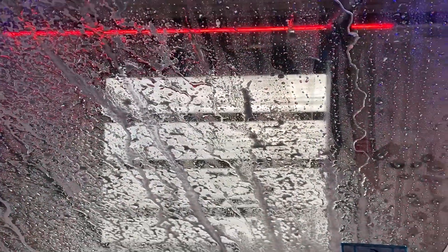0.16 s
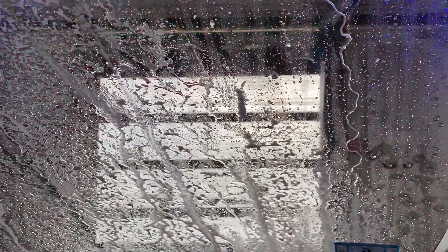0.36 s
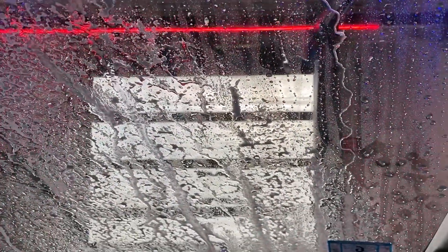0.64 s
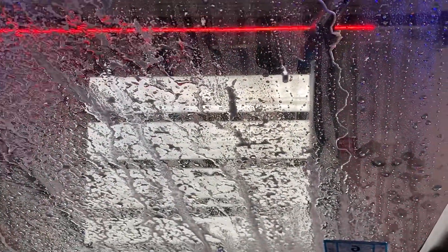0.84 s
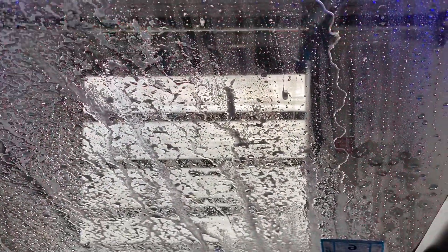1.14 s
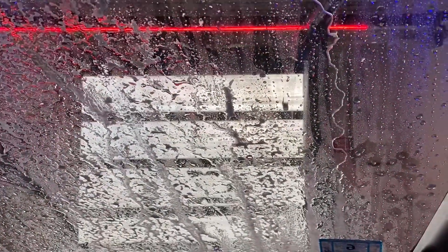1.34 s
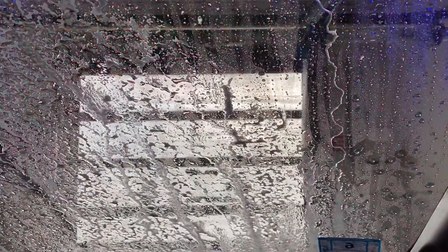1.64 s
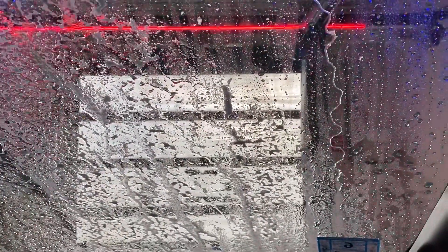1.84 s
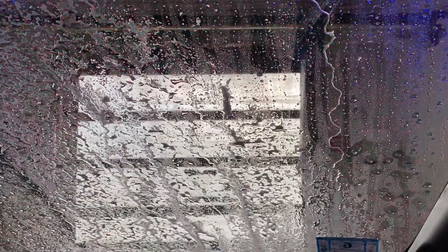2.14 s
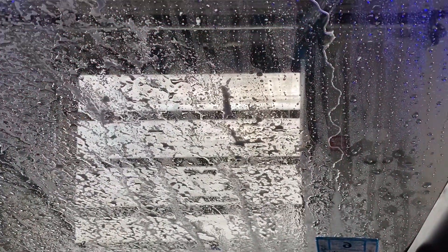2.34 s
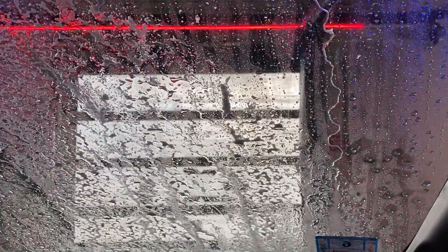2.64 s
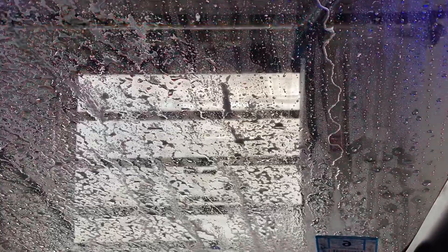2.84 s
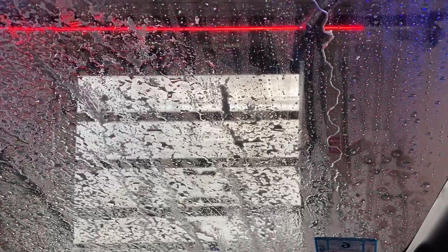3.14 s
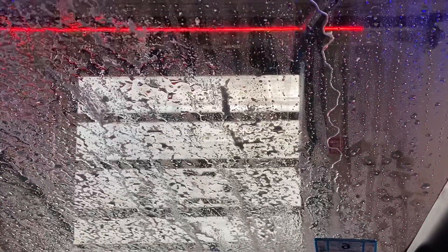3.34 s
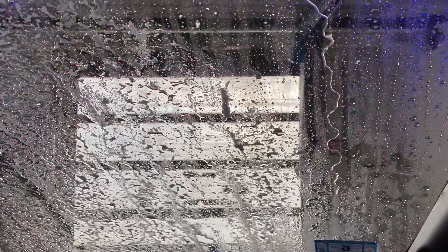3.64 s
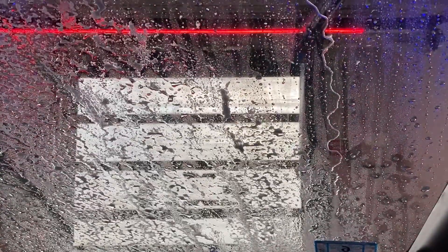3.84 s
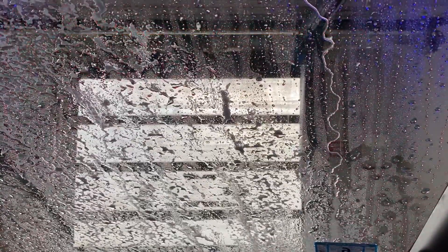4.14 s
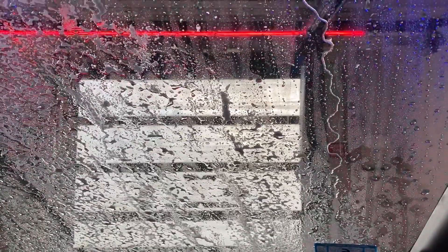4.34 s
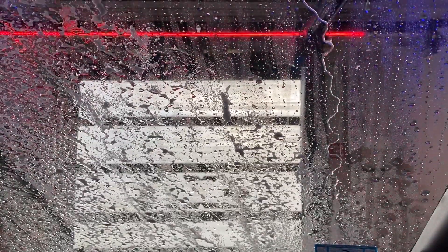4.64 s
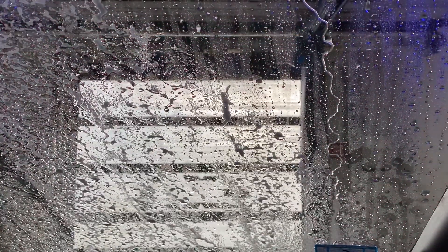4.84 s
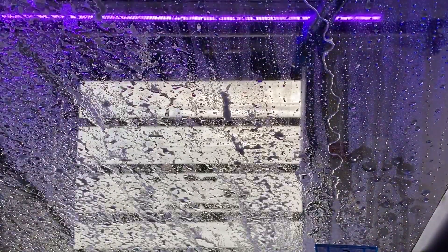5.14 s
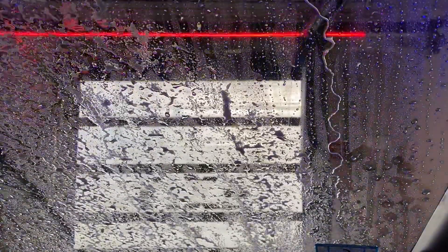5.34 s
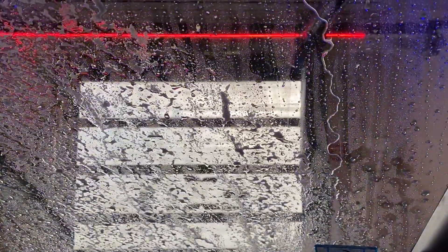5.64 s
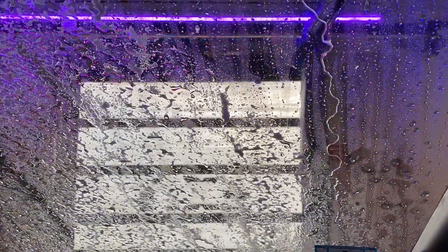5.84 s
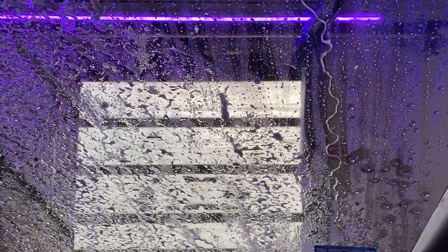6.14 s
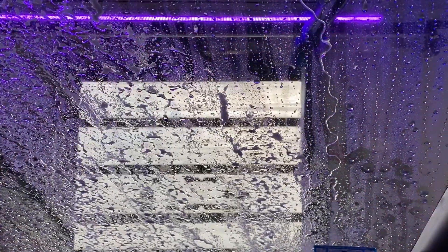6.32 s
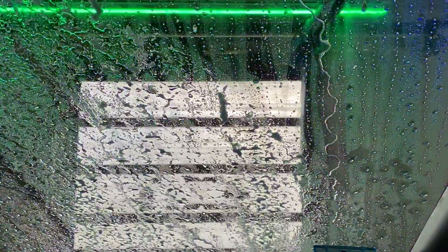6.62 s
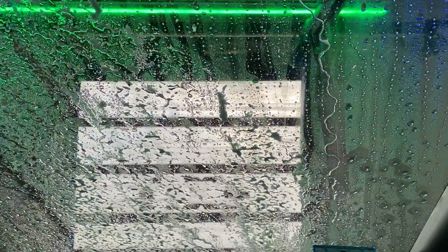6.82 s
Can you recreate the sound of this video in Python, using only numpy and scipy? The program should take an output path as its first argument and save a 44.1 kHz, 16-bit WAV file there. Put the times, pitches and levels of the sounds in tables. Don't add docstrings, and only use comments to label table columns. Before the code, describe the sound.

A wash machine works around a car, picked up in stereo within the sealed cabin. Its quiet hum wavers and dips above muffled bay noise and irregular sub-bass nudges; a small dull tick lands on the window midway. Late on, a pump kicks in with faint knocking, short pipe tones and low gulps, then spray rushes over the panels, growing louder and brighter as a bass drone booms.

```python
import sys
import numpy as np
from scipy import signal
from scipy.fft import rfft, irfft, next_fast_len
from scipy.io import wavfile
from scipy.ndimage import uniform_filter1d, map_coordinates

SR = 44100
rng = np.random.default_rng(int(sys.argv[2]) if len(sys.argv) > 2 else 0)


def master_out(mix):
    frames = np.transpose(np.atleast_2d(mix))
    ceiling = np.clip(frames, -1, 1)
    pcm = np.round(ceiling * 32767).astype(np.int16)
    wavfile.write(sys.argv[1], SR, pcm)


def ratio(d):
    e = np.asarray(d, float) / 20
    return 10 ** e


N = 307811

# start_s, crank_hz
CRANK = [
    (4.9, 42.4),
    (5.5, 42.1),
    (6.3, 42.15),
    (6.5, 42),
    (6.98, 41.85),
]
LOAD_ON_S = (6.1, 6.27)
# filling_db, loaded_db
CRANK_ORDERS_DB = [(-56, -51), (-54, -27.5), (-52, -52)]
KNOCK_ORDERS = [4, 5, 6, 8, 9, 10, 11, 12, 15, 16, 18, 19, 20, 21, 22, 23]
# filling_db, loaded_db
KNOCK_LEVELS = [(-54, -56), (-63.5, -58.5), (-66, -60), (-63.5, -68.5), (-64.5, -60), (-73.5, -63),
                (-80, -64), (-70.5, -68.5), (-75, -79.5), (-71.5, -85), (-80, -75), (-76, -78.5),
                (-72, -71), (-73.5, -74), (-71.5, -84), (-82, -81)]
# pitch_hz, level_db
GEAR_WHINES = [(404.9, -56.5), (1723, -74.5), (1906, -76), (2776, -80.5)]
# centre_s, pitch_hz, level_db,
# half_length_s
PIPE_SONGS = [
    (5.048, 723, -71.5, 0.046),
    (5.22, 1070, -67.5, 0.084),
    (5.241, 1000, -73, .05),
    (5.33, 113.2, -42, 0.12),
    (6.45, 465.4, -61, 0.16),
    (5.38, 675, -62.5, 0.024),
    (5.46, 337, -56, .08),
    (5.785, 633, -62.5, 0.13),
    (6.194, 139.4, -40.5, 0.069),
    (6.85, 503.4, -61, .15),
]
# start_s, level_db (under full)
PRESSURE = [
    (4.9, -44),
    (5.02, -38.5),
    (5.2, -23.5),
    (5.55, -15.5),
    (5.63, -13.5),
    (5.925, -14.5),
    (5.96, -9),
    (6.4, -5.5),
    (6.98, 1),
]
PIPES_FULL_DB = -20
# pitch_hz, slope (dB per dB of pressure), knee_db (pressure
# that sets it going), extra_slope (dB per dB below the knee)
SPRAY_GROWTH = [(820, 0.12, -19, .7), (1240, 0.5, -20.5, .45), (1900, 0.9, -20, 0.4),
                (3600, 1.03, -16.5, .05), (6700, 0.95, -10.5, 1.2), (11000, 1.1, -10.5, 1.2),
                (14800, 1.5, -9.5, 4)]
# pitch_hz, level_db (per Hz)
SPRAY_SPECTRUM = [(70, -27.5), (115, -4.5), (185, -21.5), (300, -27.5), (410, -28.5), (590, -33.5),
                  (850, -33.5), (1080, -34.5), (1900, -33), (3400, -41.5), (7000, -48.5), (8300, -58),
                  (14000, -53.5), (15800, -61)]

MOTOR_HZ = 16.99
SIXTH_DB, FIFTH_DB = -41, -46.5
WEAK_ORDERS = [4, 9, 10]
WEAK_ORDERS_DB = [-64, -61, -65]
# centre_s, change_db, half_length_s
LOAD_SHIFTS = [(.08, 2.5, 0.17), (.36, -18, .13), (.62, -0.5, 0.11), (1.33, -14, .07), (1.5, 4.5, 0.13),
               (2.22, 3.5, .15), (2.78, -14, .13), (3.44, -9, 0.047), (4.15, 3, 0.29), (4.55, -6.5, 0.045),
               (4.68, 1.5, 0.069), (4.84, -23.5, 0.057), (5.24, 6, 0.08), (5.55, -16.5, 0.094),
               (5.97, -7.5, .06), (6.33, -5.5, 0.096), (6.82, 5.5, 0.19)]
# pitch_hz, level_db
BAY_WHINES = [(336, -69), (838.6, -83), (1087, -88), (1996, -95), (2188, -96), (4594, -110), (11898, -113),
              (12102, -113)]

# start_s, peak_db
DRIPS = [
    (3.3318, -53),
    (4.1788, -67),
]

THROB_HZ, THROB_DB = 44.6, -53
# centre_s, rise_db
JOLTS = [(0.041, -9), (.45, 6), (1.25, 4.5), (1.54, 4.5), (1.9, 6.5), (3.15, 7), (3.47, 4.5), (4.25, 10),
         (4.75, 9), (5.6, 9), (6.25, 11.5), (6.72, 5)]
JOLT_S = 0.19
# pitch_hz, level_db (per Hz)
CABIN_MODE = [(18, -27.5), (30, -11.5), (37, -8), (45, 11.5), (57, 1), (70, -21.5), (110, -120)]
# pitch_hz, level_db (per Hz)
RUMBLE_SPECTRUM = [(18, -29.5), (32, -16), (55, -6.5), (75, -1), (100, -1), (125, -7), (150, -6),
                   (185, -18), (230, -18), (300, -29), (390, -50.5), (660, -120)]
# pitch_hz, level_db (per Hz)
BAY_SPECTRUM = [(120, -28.5), (220, -3.5), (335, -7.5), (425, -9), (465, -14), (790, -21.5), (1400, -31),
                (2250, -35), (2380, -40.5), (7500, -55.5), (9500, -57.5), (12000, -53), (13050, -54.5),
                (13200, -110)]
RUMBLE_DB, BAY_DB = -44.5, -58
# pitch_hz, width_hz, gain_db
PANELS = [(1163, 190, 4), (1680, 41, 1.5), (2186, 60, 5.5), (2730, 70, 4), (3120, 90, 5.5),
          (4000, 170, -1.5), (4500, 350, 2)]

# pitch_hz, side_over_mid_db
PORT_WIDTH = [(40, -19.5), (92, -17), (140, -12.5), (210, -7), (330, -8.5), (500, -0.5), (800, 0),
              (1170, 1), (1790, 2), (2500, -3.5), (4200, -2), (6900, -1.5), (8500, 1), (15000, 2)]
# pitch_hz, left_over_right_db
PORT_LEAN = [(60, -2), (110, 0), (200, -1.5), (380, 0.5), (700, -1.5), (1290, 1), (2380, 1), (4400, -6.5),
             (8120, 2), (15000, -0.5)]
# pitch_hz, gain_db
SUM_GAPS = [(8250, 0), (8450, -45.5), (9600, -45), (9750, -6.5), (10150, -7), (10300, -4), (14400, -3),
            (14500, -59)]
# pitch_hz, gain_db
DIFFERENCE_GAPS = [(10800, 0), (11000, -10), (11500, -8.5), (11650, -48), (13000, -53.5), (13150, -5)]


def unit(x):
    return x / np.sqrt(np.mean(x ** 2) + 1e-20)


def along(points, hz):
    f, v = np.transpose(points)
    return np.interp(np.log(hz + 1), np.log(f + 1), v)


def wobble(rate):
    return map_coordinates(rng.standard_normal(N // 500), [np.arange(N) * rate / SR])


def bumps(rows):
    t = np.arange(N) / SR
    return sum(db * np.exp(-((t - s) / half) ** 2) for s, db, half in rows)


def filtered(x, response):
    m = next_fast_len(N + SR // 2)
    return irfft(rfft(x, m) * response(np.fft.rfftfreq(m, 1 / SR)), m)[..., :N]


def tone(turns, db, lean_db=0, lead=0):
    half = np.array([[.5], [-.5]])
    phase = 2 * np.pi * (turns + rng.random()) + lead * half
    return np.sqrt(2) * ratio(db + lean_db * half) * np.sin(phase)


def rush(spectrum, patchy_db, shape_db=lambda hz, s: 0):
    def colour(f):
        return ratio(along(spectrum, f) + [0 * f, along(PORT_WIDTH, f)])

    hz, s, z = signal.stft(rng.standard_normal((2, N)), SR, nperseg=512)
    patches = uniform_filter1d(rng.standard_normal(z.shape[1:]), size=6, axis=0)
    patches = uniform_filter1d(patches, size=14, axis=1)
    scale = np.std(filtered(rng.standard_normal(N), lambda f: colour(f)[0]))
    level_db = patchy_db * unit(patches) + shape_db(hz[:, None], s)
    pair = signal.istft(z * ratio(level_db), SR, nperseg=512)[1][:, :N]
    mid, side = filtered(pair, colour) / scale
    ports = np.array([mid + side, mid - side])
    return filtered(ports, lambda f: ratio(along(PORT_LEAN, f) * [[.5], [-.5]]))


def pressure(t):
    s, db = np.transpose(PRESSURE)
    return np.interp(t, s, db, left=-90)


def pump():
    def spot():
        return dict(lean_db=rng.normal(0, 0.77), lead=rng.normal(0, 0.22))

    t = np.arange(N) / SR
    turns = np.cumsum(np.interp(t, *np.transpose(CRANK))) / SR
    load = np.interp(t, LOAD_ON_S, [0, 1])
    fill_db = np.minimum(pressure(t) - PIPES_FULL_DB, 0)

    first_db, second_db, third_db = (fill_db + a + (b - a) * load for a, b in CRANK_ORDERS_DB)
    first_db = first_db + 4 * wobble(6.6)
    second_db = second_db + 4 * np.maximum(t - LOAD_ON_S[1], 0)
    third_db = third_db + bumps([(5.36, 12, .16)]) + 2 * wobble(3.8)
    boom = tone(turns, first_db)
    boom = boom + tone(2 * turns, second_db, lean_db=-1.7, lead=0.23)
    boom = boom + tone(3 * turns, third_db, lean_db=-1.4)

    knock_db = .8 * fill_db + np.interp(load, [0, 1], [-4.5, -1])
    knock = 0
    for order, (filling_db, loaded_db) in zip(KNOCK_ORDERS, KNOCK_LEVELS):
        db = knock_db + filling_db + (loaded_db - filling_db) * load + 3 * wobble(8)
        knock = knock + tone(order * turns, db, **spot())

    gears = 0
    for hz, db in GEAR_WHINES:
        db = db + knock_db - 3 * (1 - load) + 2.5 * wobble(7)
        db = db + .5 * pressure(t) * (hz > 1000)
        gears = gears + tone(hz * t, db, **spot())

    air = 0
    for s, hz, db, half in PIPE_SONGS:
        db = db + 2.5 * wobble(25) * (hz > 300) - 6 * ((t - s) / half) ** 2
        air = air + tone(hz * t + .1 * wobble(30), db, lead=0.49)
    return boom + knock + gears + air


def spray():
    def shape_db(hz, t):
        slope, knee_db, extra = (along([(row[0], row[k]) for row in SPRAY_GROWTH], hz) for k in (1, 2, 3))
        return slope * pressure(t) + extra * np.minimum(pressure(t) - knee_db, 0)

    return ratio(-43.5 + .4 * wobble(10)) * rush(SPRAY_SPECTRUM, 0.57, shape_db)


def motor():
    t = np.arange(N) / SR
    turns = np.cumsum(MOTOR_HZ + .01 * wobble(3)) / SR
    sixth_db = SIXTH_DB + bumps(LOAD_SHIFTS) + 2.3 * wobble(7.8)
    fade_db = np.interp(t, [6.08, 6.2], [0, -25])
    fifth_db = FIFTH_DB + 1.4 * wobble(8) + fade_db
    strong = tone(6 * turns, sixth_db) + tone(5 * turns, fifth_db, lean_db=0.8)
    weak = sum(tone(order * turns, db + 2 * wobble(4), lean_db=-4)
               for order, db in zip(WEAK_ORDERS, WEAK_ORDERS_DB))
    whines = sum(tone(hz * t, db + 2 * wobble(3.3), lead=rng.normal(0, .7)) for hz, db in BAY_WHINES)
    return strong + weak + whines


def drips():
    out, t = np.zeros((2, N)), np.arange(SR // 20) / SR
    strike = ratio(-60 * t / .03) * (1 - np.exp(-t / .0007))
    rebound = .4 * ratio(-60 * np.abs(t - .011) / .06) * (t > .011)
    for s, db in DRIPS:
        tick = (strike + rebound) * rng.standard_normal((2, len(t)))
        out[:, round(s * SR):][:, :len(t)] += ratio(db + 4) * tick
    glass = [(600, -30), (1200, 2), (3000, -6), (5300, -12), (6500, -40)]  # (Hz, dB)
    return filtered(out, lambda f: ratio(along(glass, f)))


def bay():
    def tint_db(hz, s):
        return sum(db * np.exp(-((hz - centre) / width) ** 2) for centre, width, db in PANELS)

    throb_db = THROB_DB + bumps([(s, db, JOLT_S) for s, db in JOLTS])
    throb_turns = np.cumsum(THROB_HZ + 1.9 * wobble(3.3)) / SR
    throb = tone(throb_turns, throb_db - 4) + ratio(throb_db - 5) * rush(CABIN_MODE, patchy_db=3.5)
    rumble = ratio(RUMBLE_DB + .4 * wobble(2.5)) * rush(RUMBLE_SPECTRUM, patchy_db=1.4)
    return throb + rumble + ratio(BAY_DB + .5 * wobble(11)) * rush(BAY_SPECTRUM, 1.3, tint_db)


def scene():
    return pump() + spray() + motor() + drips() + bay()


def roll_off(x):
    return signal.sosfilt(signal.butter(12, 15740, fs=SR, output="sos"), x)


def record(dry):
    mid_side = np.array([dry[0] + dry[1], dry[0] - dry[1]]) / 2
    mid, side = filtered(mid_side, lambda f: ratio([along(SUM_GAPS, f), along(DIFFERENCE_GAPS, f)]))
    return roll_off(np.array([mid + side, mid - side]))


dry = scene()
out = record(dry)
master_out(out)
```